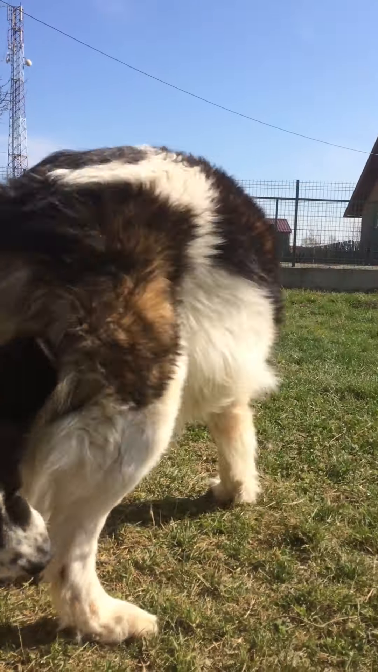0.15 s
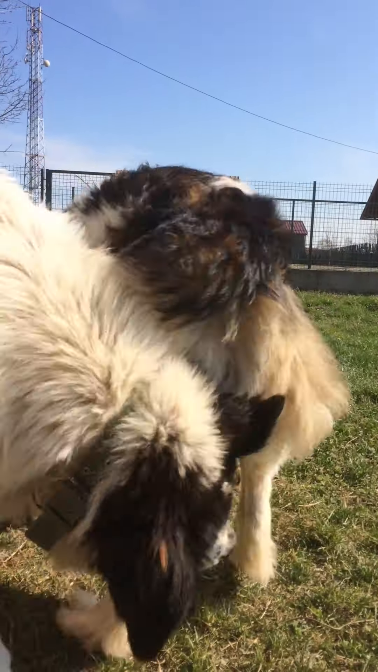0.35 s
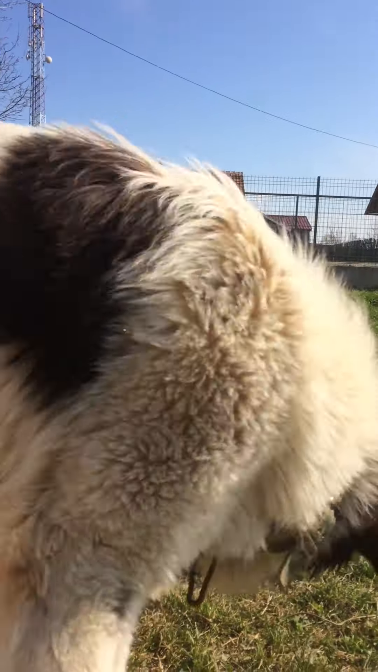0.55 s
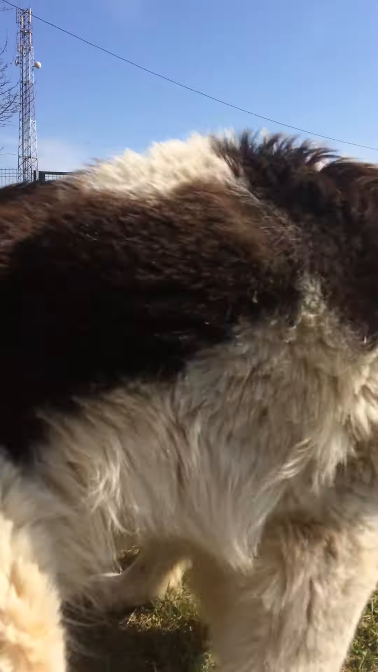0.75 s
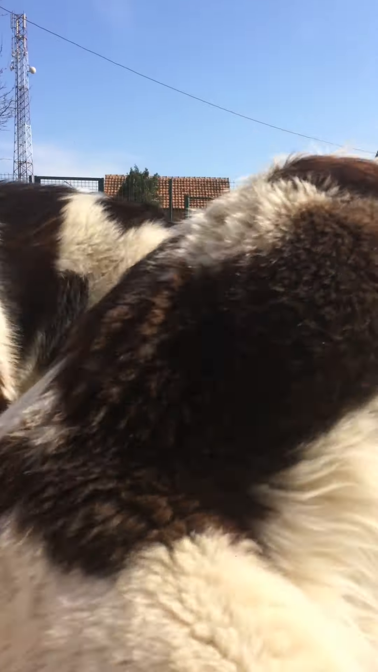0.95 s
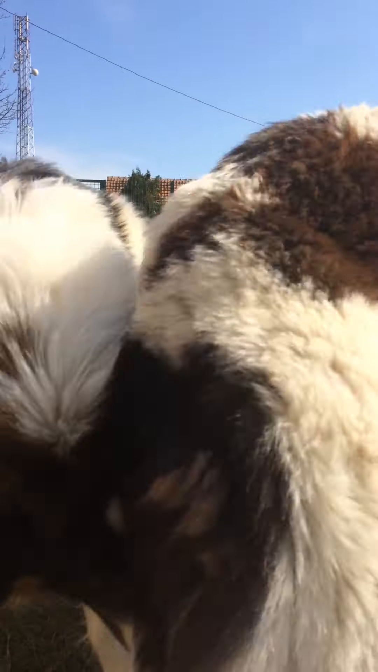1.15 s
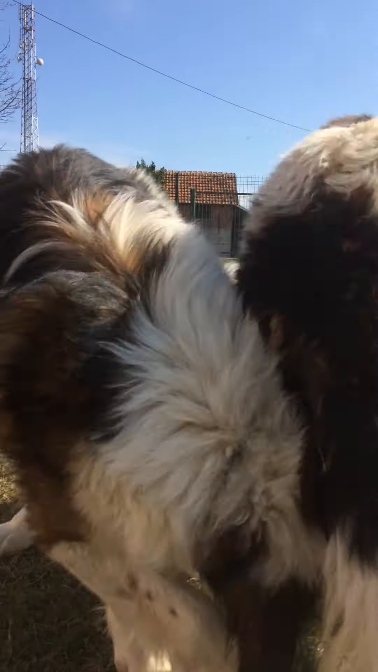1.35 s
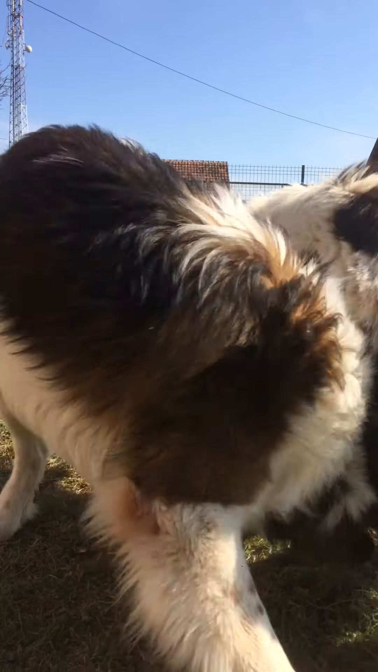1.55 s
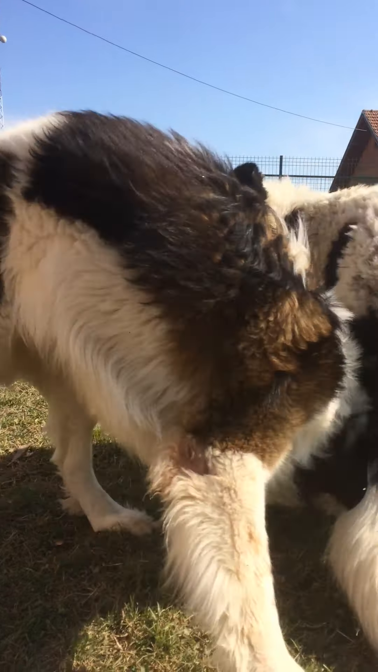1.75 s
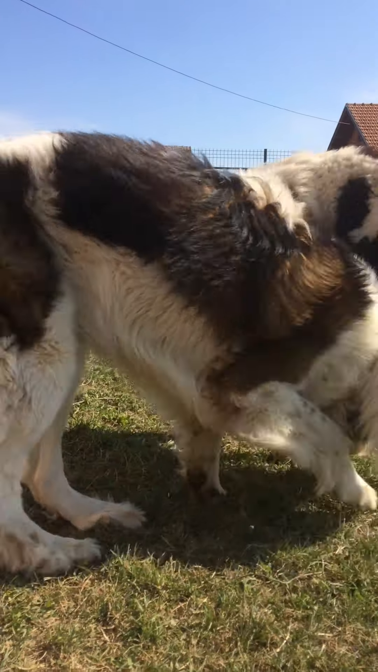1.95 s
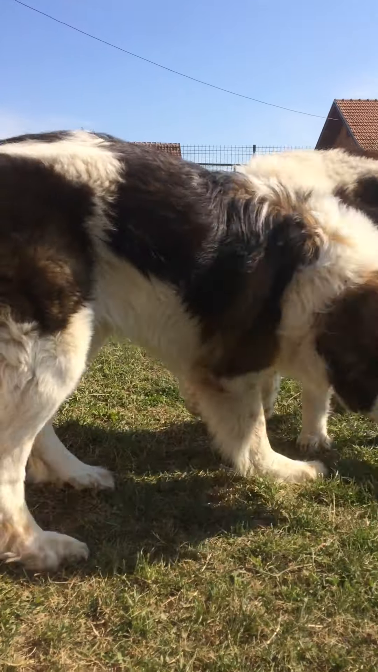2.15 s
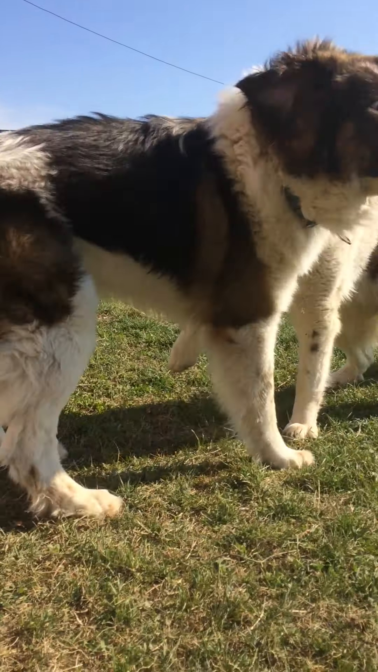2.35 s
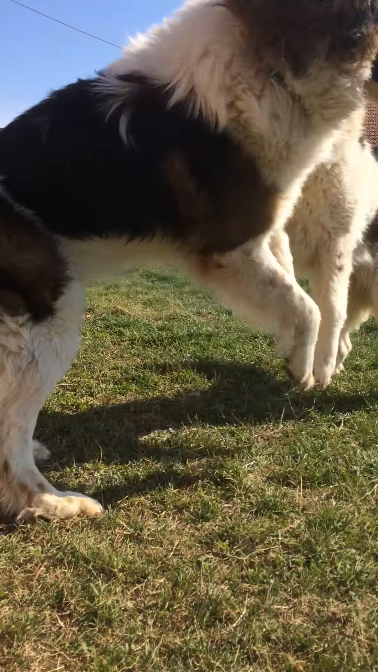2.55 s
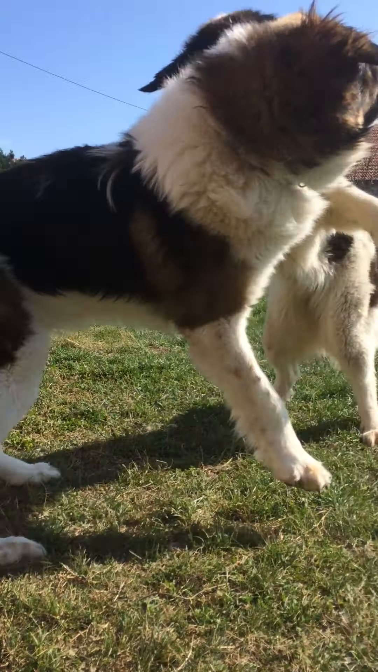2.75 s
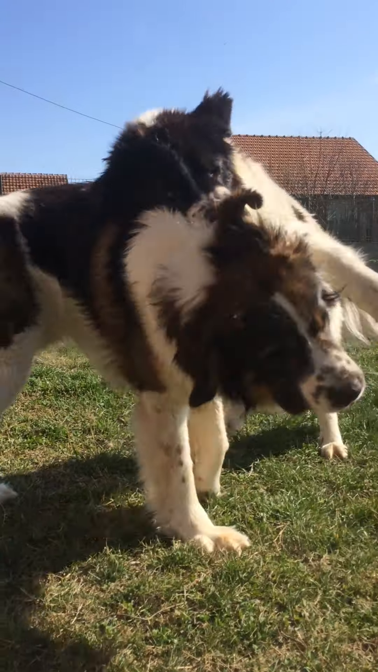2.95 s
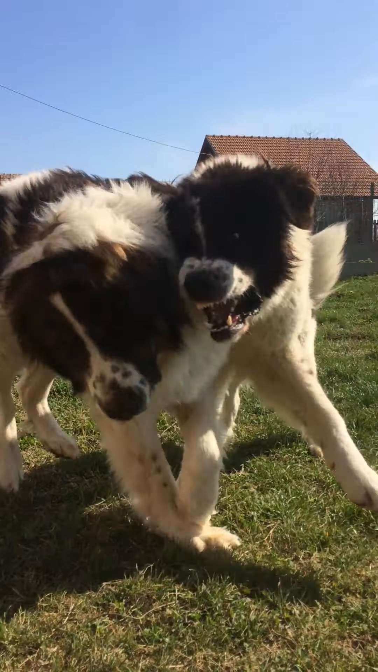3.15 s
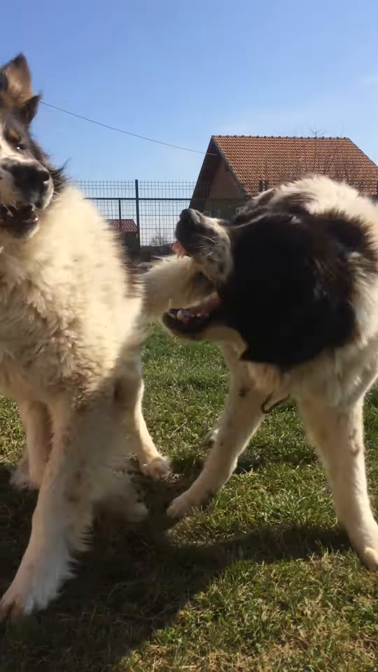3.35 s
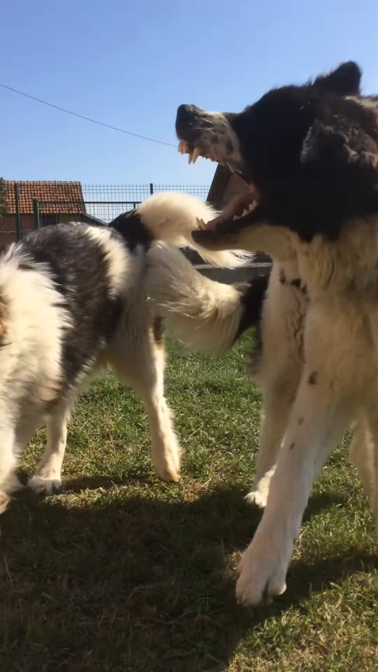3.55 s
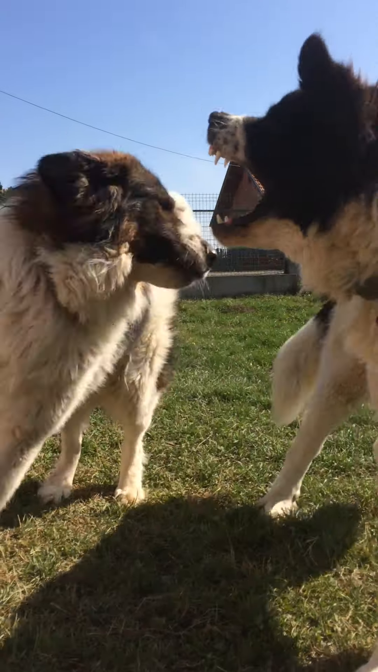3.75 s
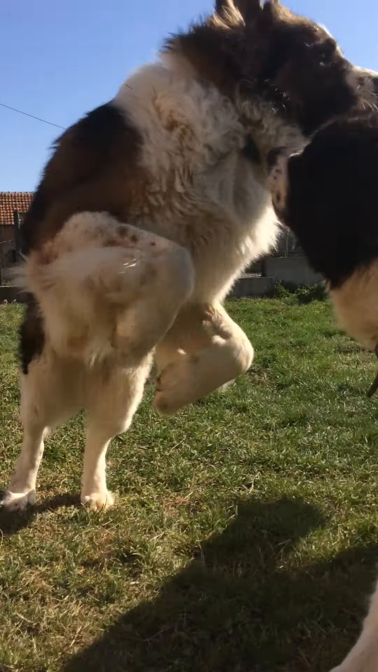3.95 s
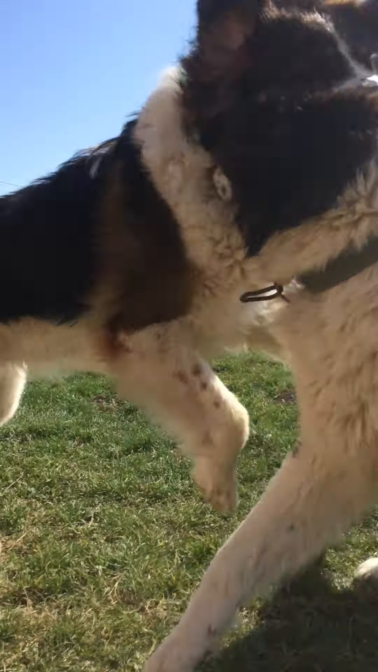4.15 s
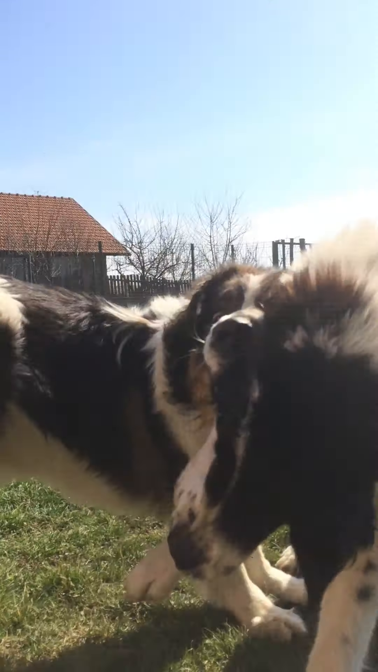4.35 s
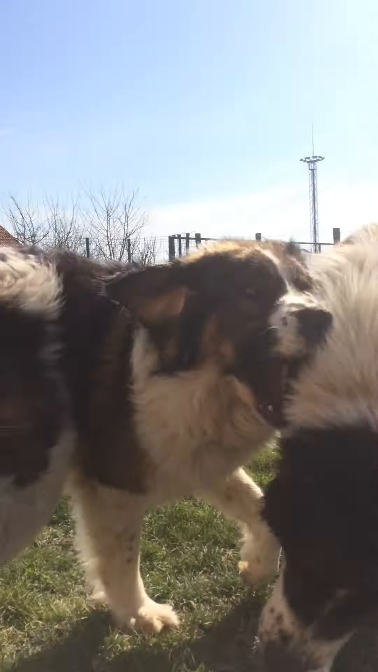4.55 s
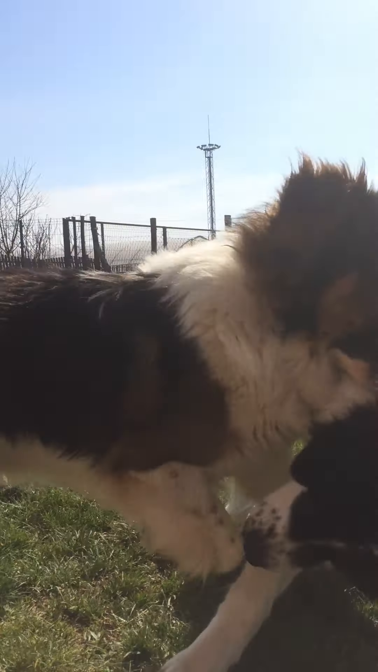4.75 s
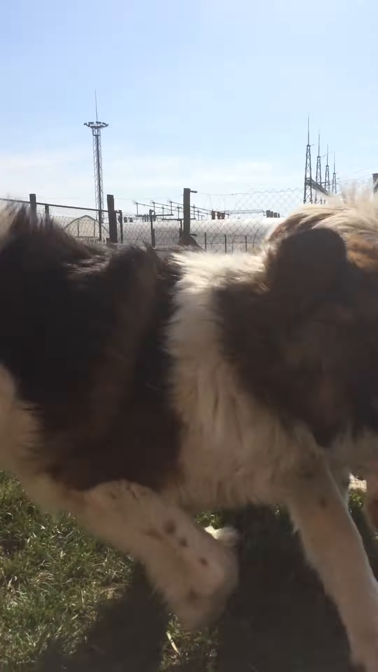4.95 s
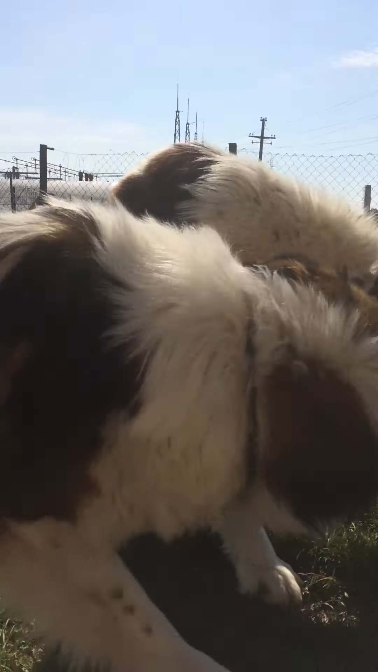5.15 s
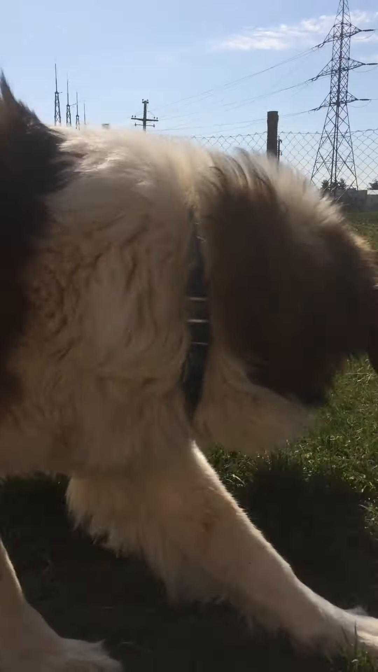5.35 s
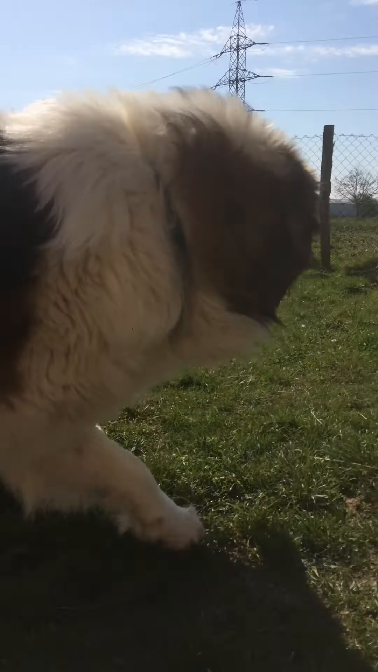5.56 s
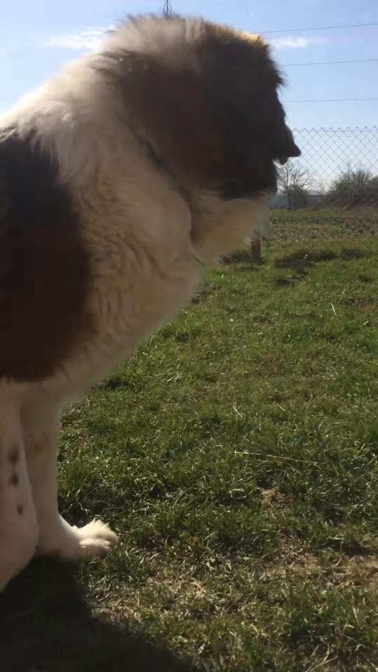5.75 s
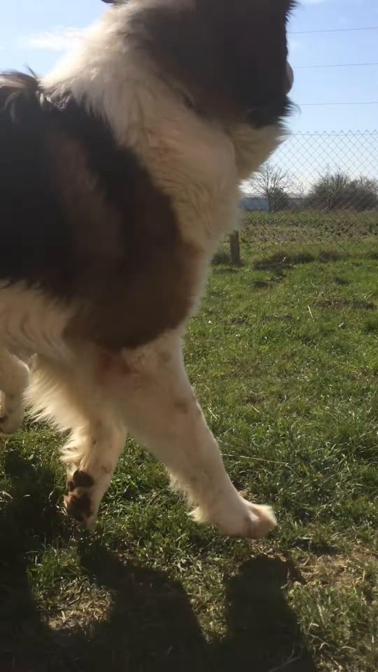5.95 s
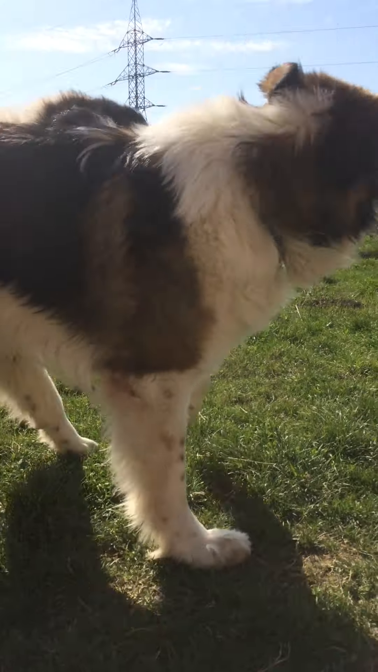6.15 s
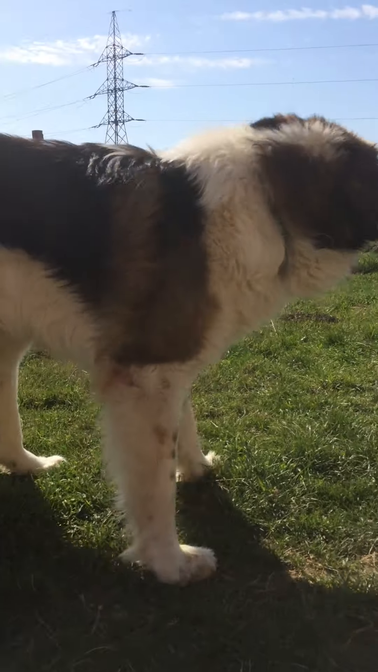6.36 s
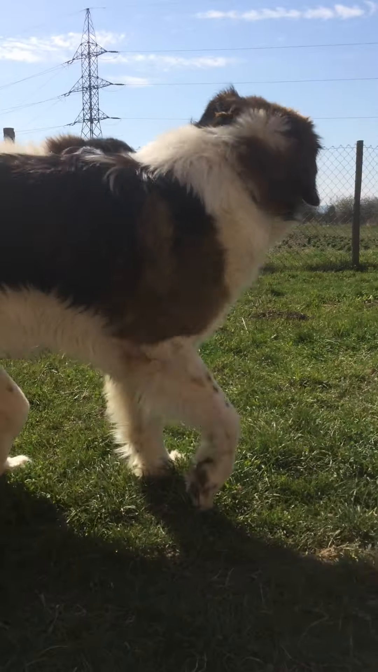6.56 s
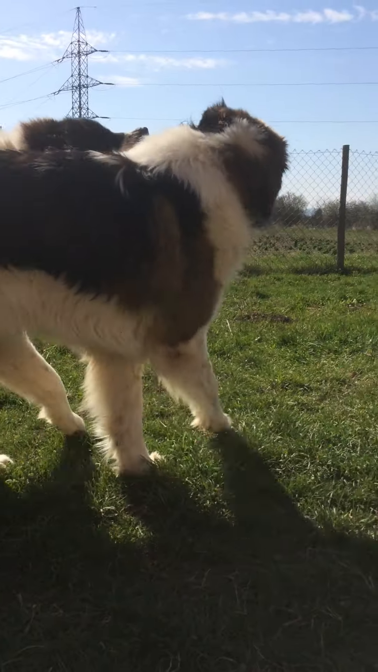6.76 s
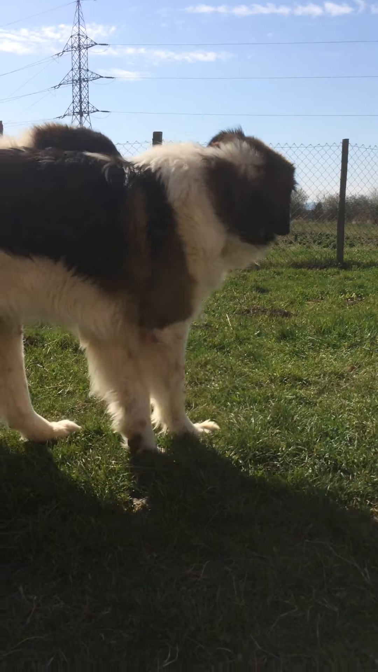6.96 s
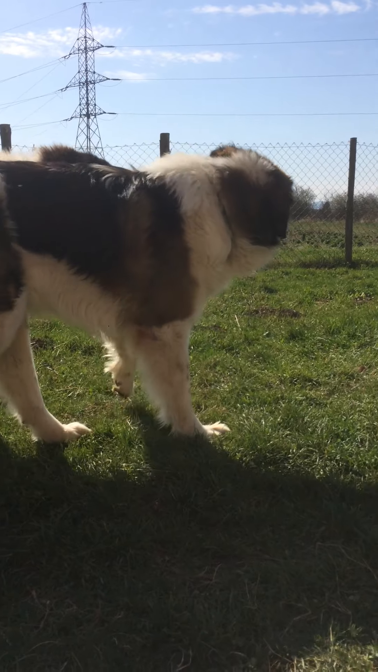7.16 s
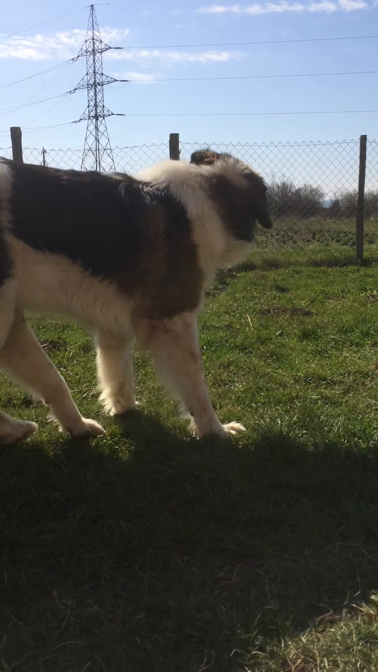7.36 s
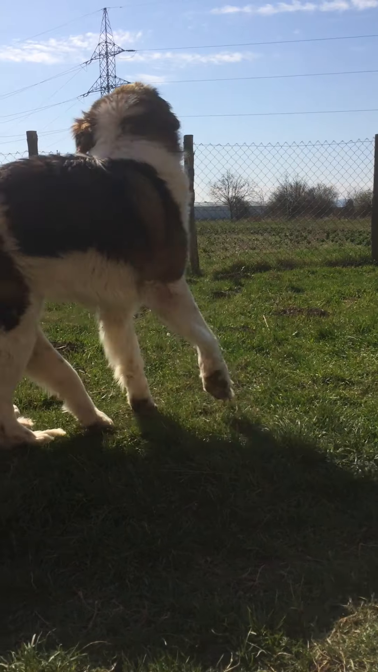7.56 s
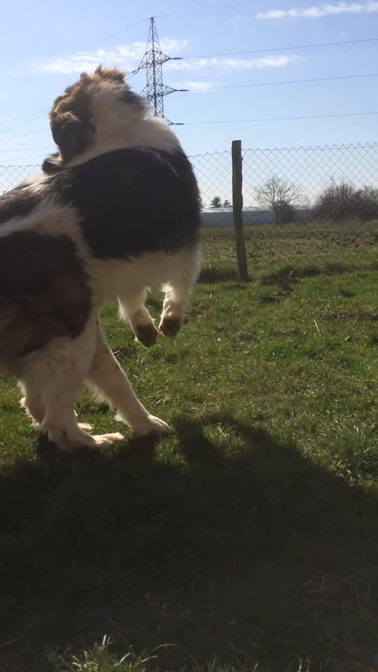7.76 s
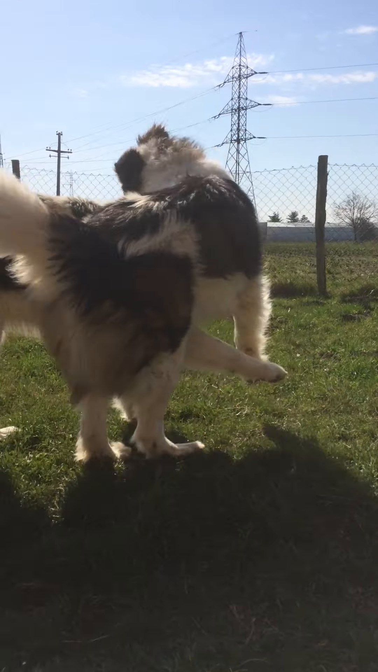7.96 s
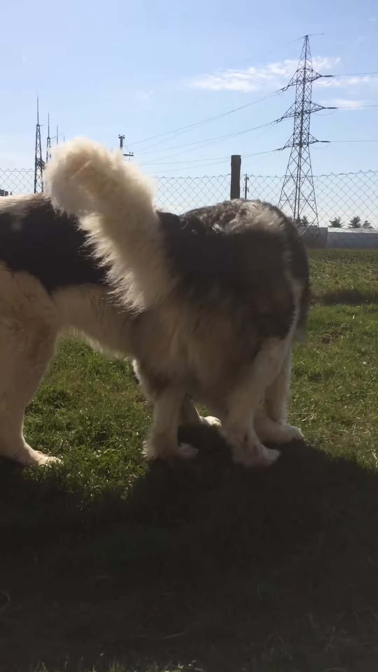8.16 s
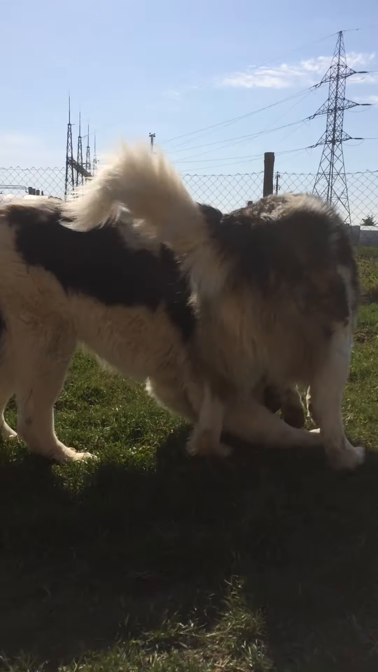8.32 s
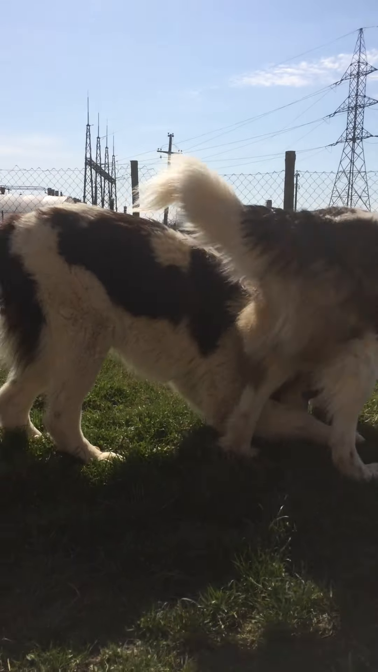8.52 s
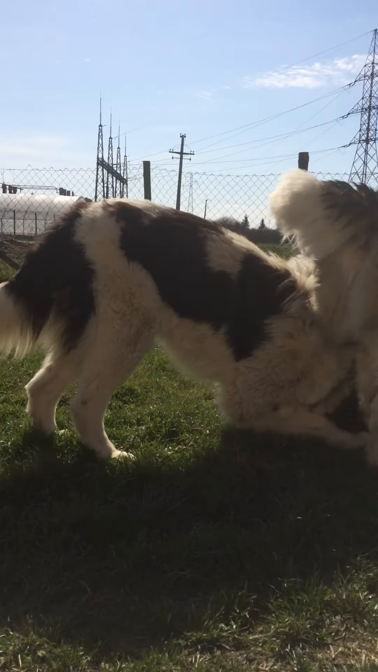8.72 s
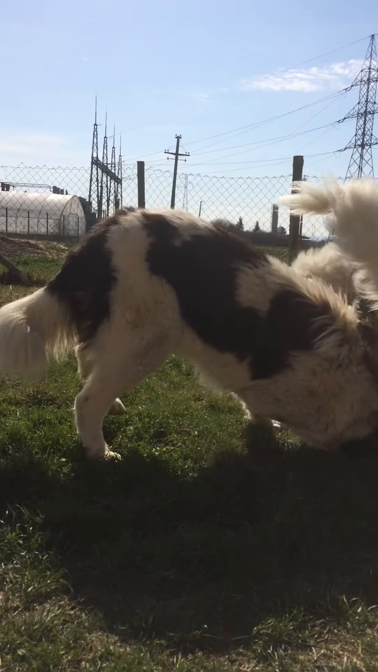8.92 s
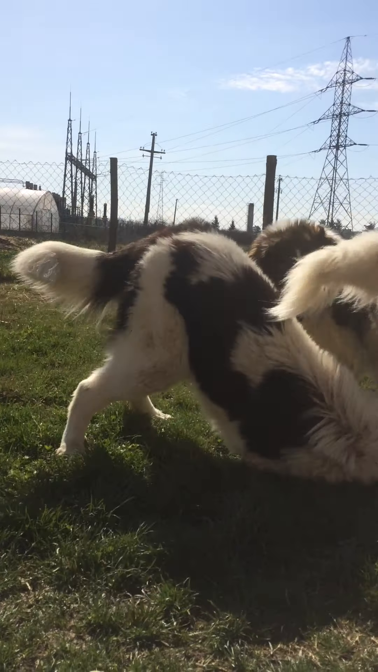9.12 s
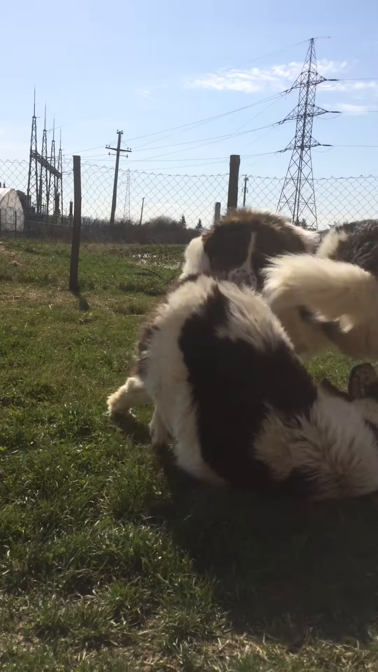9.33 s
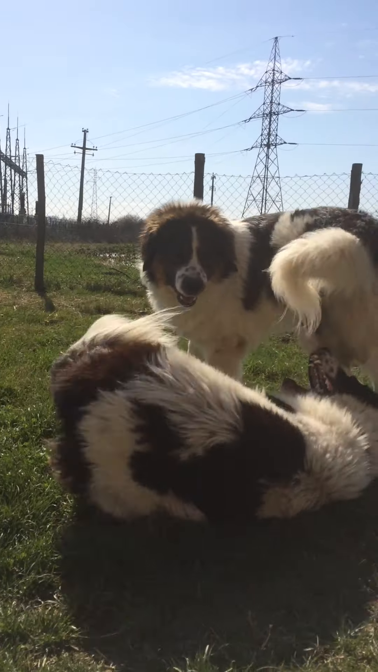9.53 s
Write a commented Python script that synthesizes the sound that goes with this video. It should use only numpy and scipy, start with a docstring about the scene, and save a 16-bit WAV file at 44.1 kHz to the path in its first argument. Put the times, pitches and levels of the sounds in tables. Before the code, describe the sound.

Close rough play of big dogs outdoors: fur and paws swish over turf, metal collars tick, two rasping growls flare up, then quieter panting.

```python
"""Large dogs wrestling on a lawn

Hoarse pants and growls are noise and fold pulses filtered by throat, mouth and jaw resonances; faint whines
are noise in one narrow resonance. Paws scuff (coloured noise with crackles), thud and tap (damped sines) and
snap stalks (noise bursts). A metal collar ring clinks as decaying modes struck by short rattles.
Behind lie a substation hum, a wavering sine, and a faint outdoor wash of coloured noise."""
import sys
import numpy as np
from scipy import signal
from scipy.fft import rfft, irfft, next_fast_len
from scipy.io import wavfile
from scipy.ndimage import uniform_filter1d

SR = 44100
rng = np.random.default_rng(int(sys.argv[2]) if len(sys.argv) > 2 else 0)


def log_audio(samples):
    """Write samples as a 16-bit WAV file to the path given in sys.argv[1]."""
    # one column per channel
    frames = np.atleast_2d(samples).T
    # limit to full scale, then quantise
    limited = np.clip(frames, -1, 1)
    pcm = np.round(limited * 32767).astype(np.int16)
    wavfile.write(sys.argv[1], SR, pcm)


N = 427329  # samples in the scene


def gain_of(db):
    """Decibel law: level to amplitude ratio."""
    return 10 ** (np.asarray(db) / 20)


def evened(x):
    """Normalisation to unit rms."""
    return x / np.sqrt(np.mean(x ** 2) + 1e-20)


def add(mix, start_s, sound):
    """Superposition: adds a sound to the mix, cut at the end of the mix."""
    part = mix[round(start_s * SR):][:len(sound)]
    part += sound[:len(part)]


def follow(rows):
    """Linear interpolation: start time and every further column of a table, sample by sample."""
    s, *columns = np.transpose(rows)
    t = np.arange(s[0], s[-1], 1 / SR)
    return s[0], [np.interp(t, s, c) for c in columns]


def wander(count, seconds):
    """Smoothed noise: random drift of rms 1 that changes over the given time."""
    size = max(round(seconds * SR), 1)
    once = uniform_filter1d(rng.standard_normal(count), size)
    return evened(uniform_filter1d(once, size))


def resonate(x, hz, width):
    """Heterodyne resonance: shifts the curve hz down to zero, smooths, and shifts back with gain 1."""
    turn = np.exp(2j * np.pi * np.cumsum(hz * np.ones(len(x))) / SR)
    r = np.exp(-np.pi * width / SR)
    return 2 * (turn * signal.lfilter([1 - r], [1, -r], x / turn)).real


def twice(x, hz, width):
    """Cascaded resonances: two in series give steeper skirts."""
    return resonate(resonate(x, hz, width), hz, 2 * width)


def coloured(x, points):
    """Spectral shaping: filters x by a curve of (Hz, dB) points, then sets unit rms."""
    hz, db = np.transpose(points)
    size = next_fast_len(len(x))
    shape_db = np.interp(np.log(np.fft.rfftfreq(size, 1 / SR) + 1), np.log(hz + 1), db)
    return evened(irfft(rfft(x, size) * gain_of(shape_db), size)[:len(x)])


def patchy(x, depth_db):
    """Time-frequency modulation: random louder and quieter patches, some hundred Hz by some ten ms."""
    z = signal.stft(x, nperseg=512)[2]
    field = uniform_filter1d(rng.standard_normal(z.shape), size=7, axis=0)
    field = uniform_filter1d(field, size=8, axis=1)
    return evened(signal.istft(z * gain_of(depth_db * evened(field)), nperseg=512)[1][:len(x)])


def yard():
    """Amplitude and phase modulation: a transformer hum wavers in the air, over a swelling noise wash."""
    # Spectrum of the outdoor wash. Each row: frequency in Hz, relative level in dB per Hz.
    wash_curve = [(15, -80), (25, -7.5), (102, -5.5), (123, -9), (249, -24), (988, -26), (4250, -41.5),
                  (14000, -36), (16000, -44)]
    hum_hz, hum_db, wash_db = 99.8, -56, -57
    t = np.arange(N) / SR
    hum_gain = np.sqrt(2) * gain_of(hum_db + 1.6 * wander(N, 0.044))
    hum = hum_gain * np.sin(2 * np.pi * hum_hz * t + 0.14 * wander(N, 0.014))
    swell_db = 1.5 * wander(N, .15) + 1.5 * wander(N, .02)
    noise = patchy(coloured(rng.standard_normal(N), wash_curve), depth_db=1)
    return hum + gain_of(wash_db + swell_db) * noise


def scuffle_gain():
    """Power addition: incoherent scuffs add their power to the steady rustle."""
    # Steady rustle of moving bodies. Each row: time in seconds, level in dB.
    rustle = [(0, -65), (1.1, -60.5), (1.8, -70), (2.9, -69), (3.4, -57.5), (4.1, -63), (5.0, -58),
              (5.7, -58), (5.95, -70.5), (6.2, -62.5), (6.7, -71), (7.9, -74), (8.4, -71), (9.69, -69.5)]
    # Paws and fur dragged over grass. Each row: loudest moment in seconds, level there in dB,
    # length in seconds over which it both rises and falls by the swell.
    scuffs = [(0.01, -52, 0.39), (0.591, -51, 0.133), (0.762, -46.5, 0.28), (0.884, -43.5, 0.294),
              (0.99, -36.5, 0.069), (1.893, -54, 1), (2.334, -54.5, 0.49), (3.47, -36.5, 0.21),
              (3.708, -35.5, 0.24), (3.947, -30, 0.16), (4.201, -56.5, 0.38), (4.359, -50, 0.166),
              (4.572, -33.5, 0.18), (4.83, -47, 0.73), (5.147, -44.5, 0.35), (5.806, -46, 0.19),
              (6.531, -54, 0.41), (8.604, -53, 0.088), (9.19, -58.5, 0.33)]
    swell_db, top = 25, 0.42  # top: share of the length at which a scuff is loudest
    t = np.arange(N) / SR
    power = gain_of(2 * np.interp(t, *np.transpose(rustle)))
    for s, db, length in scuffs:
        away = np.maximum((s - t) / top, (t - s) / (1 - top)) / length
        power += gain_of(2 * (db - swell_db * away))
    return np.sqrt(power)


def scuffle():
    """Friction noise: a swish of blades in quick gusts, with random crackles of uneven size."""
    # Spectrum of brushed grass. Each row: frequency in Hz, relative level in dB per Hz.
    grass = [(120, -9), (200, -4.5), (347, -9), (1870, -12.5), (12800, -20), (16000, -22)]
    swish = rng.standard_normal(N) * gain_of(3.55 * wander(N, 0.014))
    sizes = gain_of(5.5 * np.minimum(rng.exponential(1, N), 5))
    crackle = sizes * (rng.random(N) < 700 / SR)  # about 700 a second
    grain = rng.standard_normal(40) * np.exp(-np.arange(40) / 20.0)
    crackle = signal.oaconvolve(crackle, grain)[:N]
    return scuffle_gain() * coloured(patchy(swish, depth_db=2.5) + 0.57 * evened(crackle), grass)


def paws():
    """Impulsive excitation: stalks snap as millisecond bursts, claws tap and paws thud as damped sines."""
    # Snapping dry stalks. Each row: start in seconds, peak level in dB.
    snaps = [(0.084, -33), (0.915, -31.5), (0.9843, -28), (2.1295, -17), (2.168, -36), (2.3405, -32.5),
             (4.006, -16), (4.236, -35)]
    # Dull taps of claws on hard soil. Each row: start in seconds, level before decay in dB, frequency in Hz.
    taps = [(0.988, -31, 2760), (1.801, -34.5, 886), (1.913, -30.5, 2050), (1.942, -35, 1000),
            (1.972, -36, 738), (5.182, -29, 917), (5.484, -36.5, 538)]
    # Paws landing. Each row: start in seconds, peak level in dB, frequency in Hz.
    thuds = [(0.086, -37.5, 175), (0.216, -34, 150), (0.383, -28.5, 111), (0.739, -36, 159),
             (0.86, -32, 157), (0.988, -28.5, 175), (2.159, -36.5, 96.9), (3.687, -29.5, 187),
             (4.117, -31, 93)]
    tap_decay_s, thud_decay_s = 0.0008, 0.0027
    out, t = np.zeros(N), np.arange(3000) / SR
    for s, db in snaps:
        decay = np.exp(-t / 0.00051) + 0.018 * np.exp(-t / 0.007)
        burst = np.diff(rng.standard_normal(len(t) + 1)) * decay
        add(out, s, gain_of(db) * burst / abs(burst).max())
    for s, db, hz in taps:
        add(out, s, gain_of(db) * np.sin(2 * np.pi * hz * t) * np.exp(-t / tap_decay_s))
    for s, db, hz in thuds:
        push = np.sin(2 * np.pi * hz * t) * np.exp(-t / thud_decay_s)
        add(out, s, gain_of(db) * push / push.max())
    return out


def clinks():
    """Modal synthesis: a short rattle rings the collar ring's modes, unevenly each time, until fur muffles it."""
    # Collar touches. Each row: start in seconds, level in dB, level of the low modes against the
    # top cluster in dB, time until fur muffles the ring in seconds.
    touches = [(0.162, -43.5, -6, 0.0225), (0.405, -42, 2.5, 0.032), (0.7427, -28, -10, 0.032),
               (0.825, -33.5, -7, 0.035), (2.6553, -52, 7.5, .07), (2.73, -34, -8, 0.019),
               (2.81, -46, -1, .035), (3.113, -42.5, -6, .006), (3.296, -36, -13, 0.018),
               (3.8702, -31, -12, .03), (4.2984, -17.5, -8, .012), (4.305, -16.5, -12, 0.0085),
               (4.358, -30, -9, 0.011), (5.028, -38, -16, .012), (5.069, -41, -15, .01),
               (5.372, -35, -15, 0.014), (5.632, -43, -8, .022), (6.542, -35, 0, .02),
               (6.558, -42, 2, .008), (6.566, -27, -8, 0.0397), (8.403, -48, -15, .03),
               (8.579, -50, 1.5, 0.0102), (8.59, -31.5, -4.5, .02), (8.607, -35, -4, 0.0128),
               (8.767, -43, -12.5, .012)]
    # Modes of the ring. Each row: frequency in Hz, relative level in dB, 60 dB decay time in seconds.
    modes = [(2620, -12, .03), (4700, -12, .03), (6000, -6, .025), (7150, -3, .045), (7330, -1, .06),
             (9950, -4, .025), (13687, -2, .11), (13880, -2, .1), (14118, -4, .08)]
    out, t = np.zeros(N), np.arange(6000) / SR
    hz, mode_db, t60 = np.transpose(modes)[:, :, None]
    low = hz < 12000
    chances = rng.standard_normal((len(touches), len(modes), 1))  # each touch favours other modes
    for (s, db, low_db, free_s), chance in zip(touches, chances):
        muffling_db = 1500 * np.maximum(t - free_s, 0)
        level_db = mode_db + low * low_db + 3 * chance - 60 * t / t60 - muffling_db
        rattle = rng.standard_normal(600) ** 3 * np.exp(-t[:600] / .004)
        ringing = (gain_of(level_db) * np.sin(2 * np.pi * hz * t)).sum(0)
        ring = signal.oaconvolve(ringing, rattle)[:len(t)]
        tick = gain_of(low_db - 6) * twice(rng.standard_normal(len(t)), 10500, 5700) * np.exp(-t / 0.0048)
        onset = 1 - np.exp(-t / 0.00026)
        add(out, s, gain_of(db) * (ring / abs(ring).max() + tick) * onset)
    return out


def whines():
    """Narrow-band noise: air in one resonance that drifts a little and falls by its own width."""
    # Thin or breathy whines. Each row: start in seconds, length in seconds, frequency in Hz,
    # width in Hz, level before the fades in dB.
    cries = [(2.196, 0.14, 1580, 60, -59), (4.92, 0.14, 1075, 20, -62), (5.38, 0.12, 1095, 20, -59),
             (5.58, 0.1, 2450, 300, -58), (6.79, 0.19, 770, 16, -68), (7.38, 0.14, 850, 16, -70),
             (8.855, 0.22, 1740, 220, -59)]
    out = np.zeros(N)
    for s, length, hz, width_hz, db in cries:
        count = round(length * SR)
        fall_hz = np.linspace(-width_hz, width_hz, count) / 2
        pitch_hz = hz * (1 + .006 * wander(count, 0.062)) - fall_hz
        tone = twice(rng.standard_normal(count), pitch_hz, width_hz)
        add(out, s, gain_of(db) * evened(tone) * signal.windows.tukey(count, .9))
    return out


def snarl(breath):
    """Band-pass filtering: the chopped breath past bared teeth, in one raspy high band that shifts."""
    # Path of the band. Each row: time in seconds, frequency in Hz, level in dB.
    path = [(3.0, 4600, -61.5), (3.06, 5200, -66.5), (3.13, 4560, -62.5), (3.285, 5400, -61)]
    out, (s, (hz, db)) = np.zeros(N), follow(path)
    air = breath[round(s * SR):][:len(hz)] * gain_of(5 * wander(len(hz), .012))
    add(out, s, gain_of(db) * evened(twice(air, hz, 520)) * signal.windows.tukey(len(hz), .1))
    return out


def rasps():
    """Pulsed tones with noise: single slaps of the folds ring the mouth; the first row is a brief high chirp."""
    # A brief high chirp in the first row, then slaps of the folds. Each row: start in seconds,
    # tone level at the peak of the swell in dB, frequency in Hz.
    bursts = [(0.036, -42, 4738), (2.196, -32.5, 810), (2.84, -37.5, 597), (3.028, -35, 462),
              (3.202, -41, 1350), (3.383, -27, 612), (3.447, -29.5, 790), (3.471, -20.5, 628),
              (3.889, -31.5, 990), (3.923, -26, 910), (3.938, -22, 1022), (3.962, -21, 1036),
              (3.98, -26, 1083), (4.006, -14.5, 1015), (4.05, -27, 1071), (4.402, -27, 471),
              (4.544, -20, 773), (4.564, -15.5, 1328), (4.578, -21.5, 1374), (4.562, -13.5, 626),
              (4.581, -18, 715), (4.594, -27, 742), (4.795, -26, 906), (4.861, -33.5, 2370),
              (8.309, -34, 745)]
    # Spectrum of the noise in each burst. Each row: frequency in Hz, relative level in dB per Hz.
    burst_noise = [(300, -7.5), (600, 6.5), (1400, -1), (2800, -8), (7000, -35)]
    out, t = np.zeros(N), np.arange(1500) / SR
    swell = (t / 0.0045 * np.exp(1 - t / 0.0045)) ** 2  # peaks after 4.5 ms
    for s, db, hz in bursts:
        noise = coloured(rng.standard_normal(len(t)), burst_noise)
        add(out, s, gain_of(db) * swell * (np.sin(2 * np.pi * hz * t) + 0.25 * noise))
    return out


def pant(top_s, rise, fall, db, mouth_hz, throat_db, hiss_db, stretch):
    """Effort envelope: one breath as a rounded curve; the mouth ring swells most, throat and hiss less."""
    swell_db, knee = 27.5, 0.29  # knee: share of the swell lost halfway down either flank
    throat_stays, hiss_stays = 0.398, 0.077  # share of the swell that each does not follow
    places = (-rise, -rise / 2, 0, fall / 2, fall)
    lost_db = swell_db * np.array([1, knee, 0, knee, 1])
    return [(top_s + s, db - d, mouth_hz, throat_db + throat_stays * d, hiss_db + hiss_stays * d, stretch)
            for s, d in zip(places, lost_db)]


def cavity(air, modes, stretch):
    """Parallel formants: a sum of resonances, each wandering since tongue and lips never hold still."""
    return sum(gain_of(db) * twice(air, hz * stretch * (1 + .06 * wander(len(air), .025)), width)
               for hz, width, db in modes)


def pants(breath):
    """Source-filter principle: fluttering air through throat and moving mouth, with hiss from the open jaw."""
    # Short breaths. Each row: loudest moment in seconds, rise and fall in seconds, effort in dB, mouth
    # resonance in Hz, throat and hiss levels against effort in dB, throat pitch as a multiple of rest.
    pant_rows = [ (0.221, 0.034, 0.067, -42.5, 945, -5.5, -0.5, 1.07),
                 (0.269, 0.051, 0.056, -45, 1090, -12, 0, 1.05),
                 (2.19, 0.0286, 0.16, -53.5, 780, 0, -1.5, 1.02),
                 (2.673, 0.17, 0.081, -52.5, 920, -2.5, -36, 1.34),
                 (3.464, 0.052, 0.064, -26, 1020, -6.5, -3.5, 1.16),
                 (3.715, 0.1, 0.1154, -56.5, 1080, 5, 11.5, 1.305),
                 (4.007, 0.14, 0.14, -30, 960, -8, -7, 1.05),
                 (4.802, 0.056, 0.13, -34.5, 960, -4.5, -2.5, 1.194),
                 (5.33, 0.063, 0.14, -37.5, 1048, -13.5, -7, 1.02),
                 (5.79, 0.033, 0.12, -41.5, 1010, -2, -1.5, 1.108),
                 (6.233, 0.0099, 0.15, -49.5, 1099, -5.5, -16, 1.2),
                 (7.058, 0.153, 0.16, -42.5, 1011, -14.5, -22, 1.16),
                 (7.582, 0.071, 0.17, -45.5, 896.5, -10.5, -19, 1.185),
                 (7.785, 0.062, 0.042, -53, 1110, 4, -33, 1), (8.06, 0.035, 0.2, -51.5, 1186, -2, -4, 0.56),
                 (8.314, 0.049, 0.099, -39.5, 815, -7.5, -15, 1.066),
                 (8.59, 0.24, 0.054, -59, 970, 1, -3, 0.97),
                 (9.006, 0.24, 0.11, -65.5, 920, 6.5, -12.5, 1.11),
                 (9.435, 0.054, 0.079, -46.5, 1030, -24.5, -15, 1.04)]
    # Breath of the two long growls, a list of rows each. Each row: time in seconds, then effort, mouth,
    # throat, hiss and throat pitch in the units above.
    growl_breath = [
        [(2.83, -51, 950, 8.5, -22, .95), (2.845, -47, 890, -2, -29.5, .9), (2.92, -59.5, 940, 10.5, -12, .76),
         (3.04, -48, 1130, 5.5, -12, .72), (3.12, -52.5, 1234, -29.5, 4, .8), (3.18, -41, 1297, -43, -15, 1.05),
         (3.28, -39, 1260, -6.5, -12, 1.25), (3.33, -48, 1300, 8.5, -29, 1.25), (3.38, -35, 1260, 0, 0.5, 1.05),
         (3.42, -38, 1180, -7.5, -8, .95)],
        [(4.32, -68, 930, 21, -7.5, .66), (4.405, -55, 1190, 20, -6, .72), (4.43, -42, 1290, 2.5, -2, .8),
         (4.51, -39, 1250, 3.5, -0.5, .9), (4.578, -21, 1376, -10, -4.5, 1.1),
         (4.642, -74, 1080, 28.5, 1, 1.05), (4.74, -59, 887, 10, 10, .9)],
    ]
    # Throat, then jaw resonances. Each row: frequency at rest in Hz, width in Hz, relative level in dB.
    throat_modes = [(400, 210, 5.5), (626, 158, 9)]
    jaw_modes = [(1758, 370, 16), (2324, 580, 10.5), (3500, 900, -1), (4412, 1710, -11.5)]
    # Added level of the lower throat resonance in dB, one value for each long growl.
    low_throat_db = [-17, 2.5]
    mouth_width_hz = 130
    jaw_opens = .1  # the hiss resonances climb by this share over one breath
    out = np.zeros(N)
    breaths = growl_breath + [pant(*row) for row in pant_rows]
    for rows, low_db in zip(breaths, low_throat_db + [0] * len(pant_rows)):
        s, (effort_db, mouth_hz, throat_db, hiss_db, stretch) = follow(rows)
        count = len(mouth_hz)
        air = breath[round(s * SR):][:count] * gain_of(1.8 * wander(count, 0.021))
        # a sharp peak on a broad shoulder
        mouth = twice(air, mouth_hz, mouth_width_hz) + 0.34 * twice(air, 836, 402)
        throat = cavity(air, np.add(throat_modes, [(0, 0, low_db), (0, 0, 0)]), stretch)
        jaw_stretch = stretch ** 0.33 * (1 + jaw_opens * np.linspace(-.5, .5, count))
        hiss = patchy(cavity(air, jaw_modes, jaw_stretch), depth_db=3)
        sound = evened(mouth) + gain_of(throat_db) * evened(throat) + gain_of(hiss_db) * hiss
        add(out, s, gain_of(effort_db) * sound * signal.windows.tukey(count, .1))
    return out + rasps()


def grunt(s, length, hz, db):
    """Pitch and level contour: one grunt swells, fades, and sags in pitch."""
    top, rise_db, fall_db, sag = .42, 5, 15, 0.05996  # top: loudest at this share of its length
    return [(s, hz * (1 + sag), db - rise_db), (s + top * length, hz, db),
            (s + length, hz * (1 - sag), db - fall_db)]


def growls():
    """Self-oscillating folds: uneven cycles give a chest tone, chop the breath and buzz in the throat."""
    # Voice of the two long growls, a list of rows each. Each row: time in seconds, pitch in Hz,
    # chest tone in dB.
    growl_voice = [
        [(2.82, 105.9, -31), (2.96, 108.1, -39.5), (3.03, 134.2, -37), (3.11, 126.9, -35),
         (3.145, 122.1, -36.5), (3.262, 119.9, -30), (3.29, 105.6, -39.5), (3.37, 86.34, -36), (3.42, 80, -45)],
        [(4.33, 71.26, -27), (4.395, 76.09, -37.5), (4.44, 96.59, -39), (4.485, 105.9, -39),
         (4.624, 90.6, -27.5), (4.72, 97.04, -41.5)],
    ]
    # Short voiced grunts under a pant. Each row: start in seconds, length in seconds, pitch in Hz,
    # chest tone in dB.
    grunt_rows = [(3.432, 0.1248, 72.77, -35.5), (3.909, 0.12, 82.86, -33.5), (4.769, 0.117, 94.2, -33.5),
                  (7.521, 0.33, 89.95, -48), (8.039, 0.12, 97.2, -49), (8.174, 0.11, 94.5, -45.5),
                  (8.274, 0.0622, 98.5, -38.5), (8.95, 0.14, 86.4, -42)]
    # a voice that starts above throb_from_hz begins in throbs that even out
    throb_hz, throb_db, throb_s, throb_from_hz = 27.5, 11, .2, 104
    chest, gate, buzz = np.zeros((3, N))
    for rows in growl_voice + [grunt(*row) for row in grunt_rows]:
        s, (hz, db) = follow(rows)
        count = len(hz)
        t = np.arange(count) / SR
        fade = signal.windows.tukey(count, .22)
        turns = np.cumsum(hz * (1 + .055 * wander(count, .015))) / SR
        cycle_db = 3.0 * rng.standard_normal(int(turns[-1]) + 1)  # each cycle differs
        strength = gain_of(cycle_db)[turns.astype(int)]
        throb_depth_db = throb_db * (hz[0] > throb_from_hz) * np.exp(-t / throb_s)
        throb = gain_of(throb_depth_db * (np.sin(2 * np.pi * throb_hz * (t - .017)) - .5))

        step = gain_of(np.maximum(-.45 * (hz - 52), -18))  # the deepest notes carry the most overtones
        phase = 2 * np.pi * turns
        tone = np.sin(phase) + step * np.sin(2 * phase) + 0.74 * step * np.sin(3 * phase)
        # loose tissue rumbles along
        tone += 0.21 * evened(twice(rng.standard_normal(count), 124.0, 60))
        level = np.sqrt(2) * throb * gain_of(db + 1.8 * wander(count, 0.012))
        add(chest, s, level * tone * fade)

        puffs = np.exp(-(turns % 1) / 0.99) * strength * throb
        add(gate, s, 0.3 * fade * (evened(puffs) - 1))
        clicks = np.diff(np.floor(turns), prepend=0) * strength * throb  # the folds shut
        add(buzz, s, 0.68 * fade * evened(clicks))
    return chest, (1 + gate) * rng.standard_normal(N) + buzz


def scene():
    """Superposition: all sources sum into one channel."""
    chest, breath = growls()
    voices = chest + pants(breath) + snarl(breath) + whines()
    return (voices + scuffle() + clinks() + paws() + yard())[None]


def record(dry):
    """Band limiting: the small microphone loses the deepest bass, then a steep low-pass cuts the top."""
    edge_hz = 16000
    thin = signal.sosfilt(signal.butter(2, 45., "highpass", fs=SR, output="sos"), dry)
    low_pass = signal.firwin(511, edge_hz, window=("kaiser", 9), fs=SR)
    return signal.oaconvolve(thin, low_pass[None], "same")


dry = scene()
out = record(dry)
log_audio(out)
```